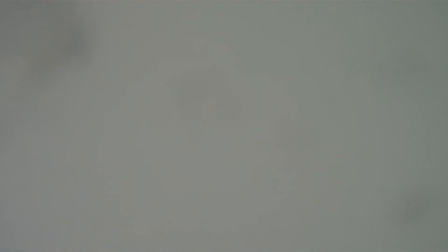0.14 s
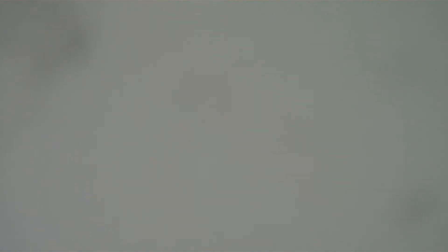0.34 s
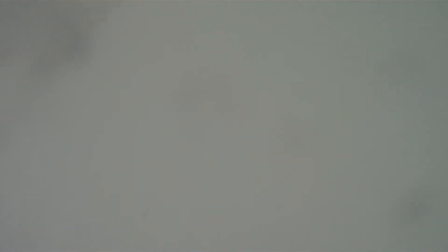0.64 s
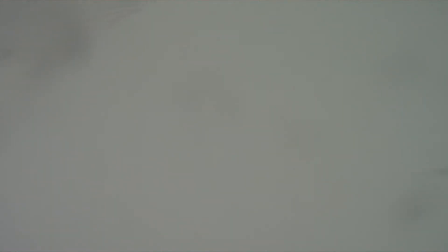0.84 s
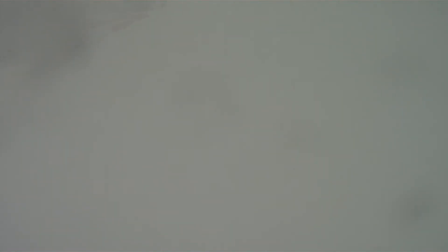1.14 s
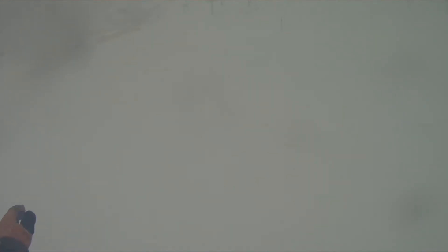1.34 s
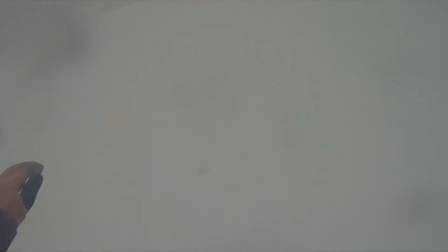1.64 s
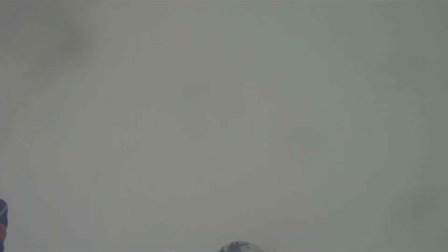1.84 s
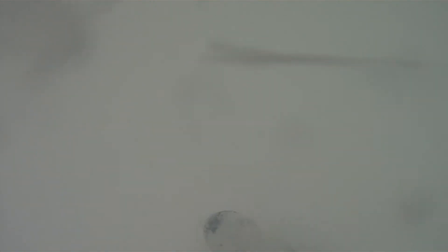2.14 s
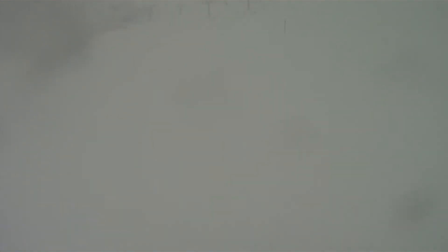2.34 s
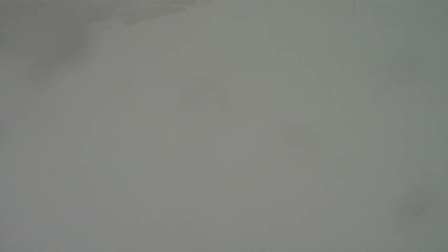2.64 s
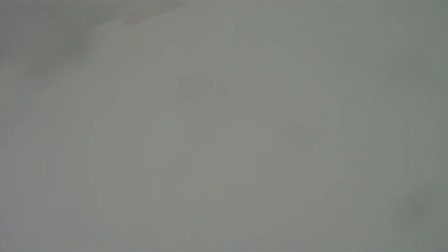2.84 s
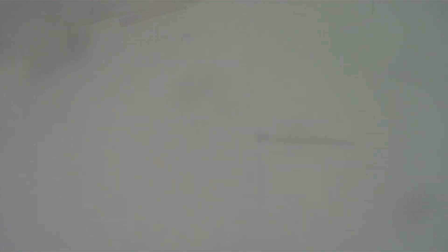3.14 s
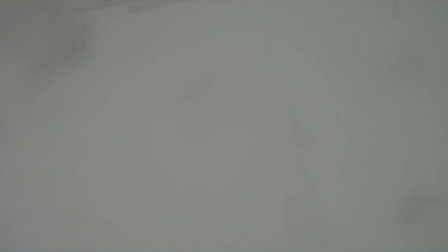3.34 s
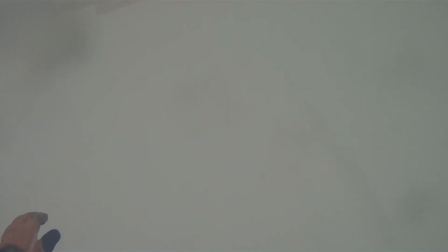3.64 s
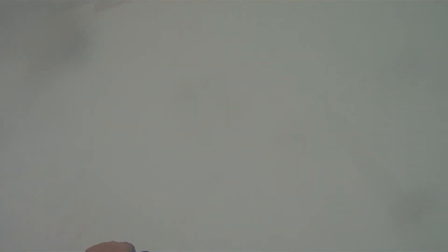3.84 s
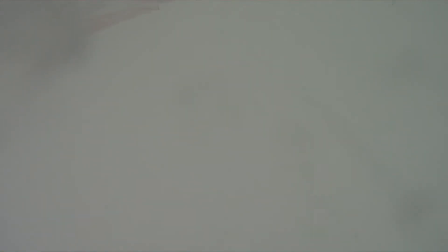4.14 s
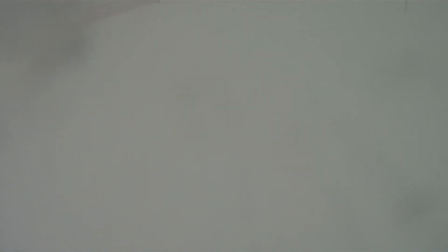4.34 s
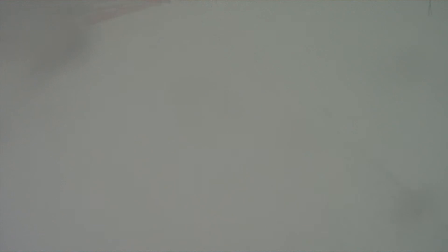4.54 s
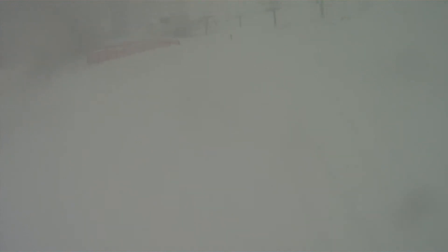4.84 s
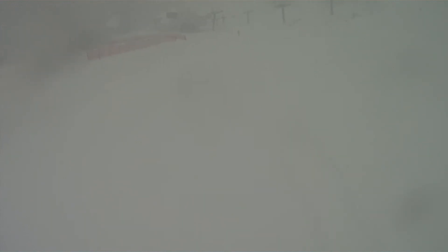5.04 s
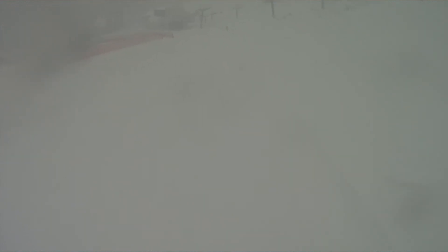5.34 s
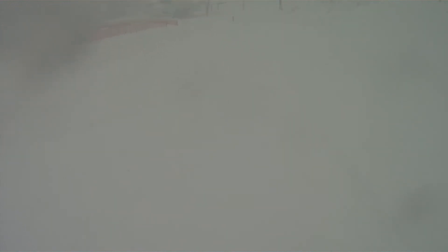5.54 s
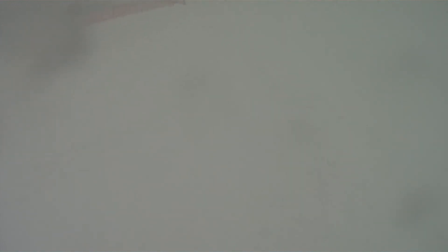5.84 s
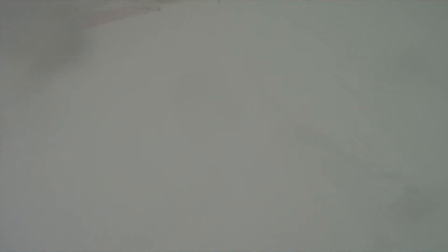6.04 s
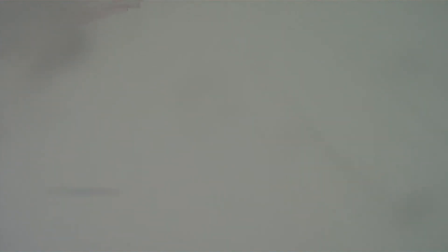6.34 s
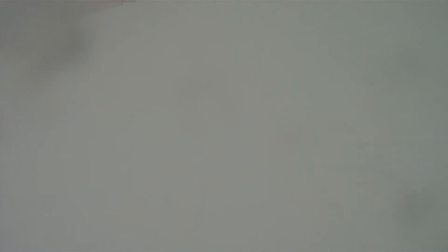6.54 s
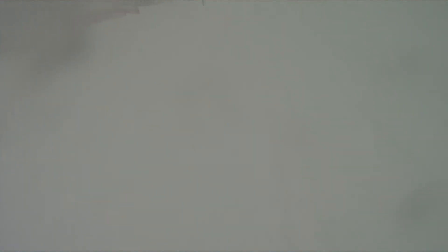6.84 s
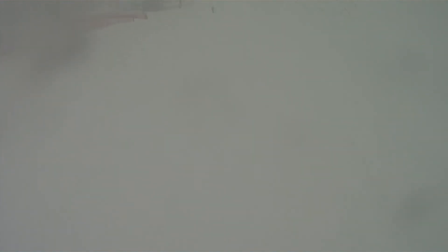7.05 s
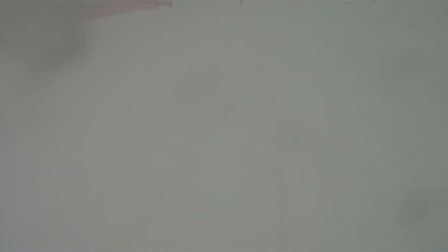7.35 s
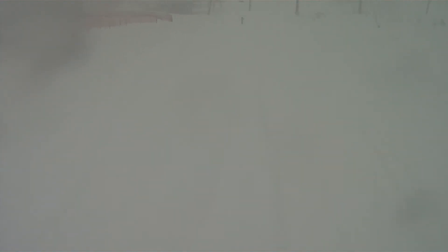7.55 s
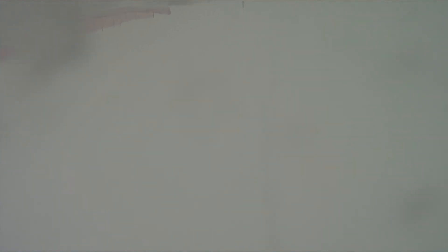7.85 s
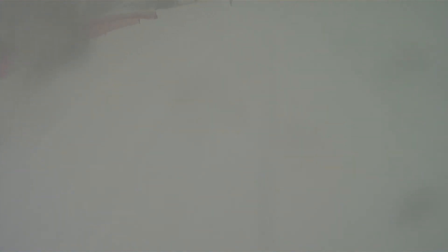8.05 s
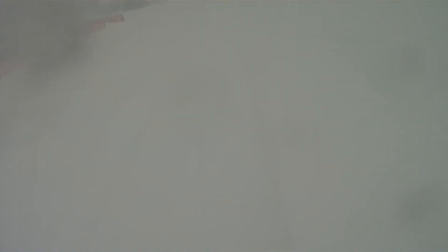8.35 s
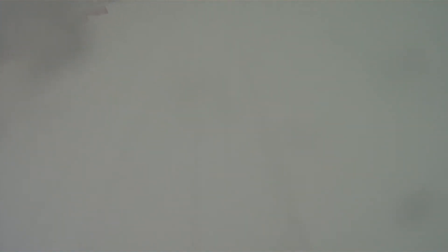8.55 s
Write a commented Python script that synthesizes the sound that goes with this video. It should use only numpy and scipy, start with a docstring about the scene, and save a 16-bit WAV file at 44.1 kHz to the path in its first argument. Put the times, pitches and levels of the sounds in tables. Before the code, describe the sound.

Snow streams over a camera case worn by a snowboarder, making a continuous, hollow hiss dotted with icy ticks and short bursts of patter. Wind buffets the microphone and the mount rumbles, most strongly early on. Several hard cracks and thumps come in quick succession, then a single knock a little later. The ride down the slope carries on with softer hiss and scattered spray, all close, with a grainy treble.

```python
"""Snowboard run from inside a camera case.

A snowboard runs down a soft slope, heard through the plastic case of a small camera on the rider.
Snow hisses and patters on the case, wind shakes it, and a few hard knocks make it thump on its mount.
Packed snow squeaks briefly. The camera samples slowly and holds each sample, which mirrors the sound
into a gritty treble."""
import sys
import numpy as np
from scipy import signal
from scipy.fft import rfft, irfft
from scipy.io import wavfile

SR = 44100
rng = np.random.default_rng(int(sys.argv[2]) if len(sys.argv) > 2 else 0)


def dump_mix(stems):
    """Bounce the given channels to the path in sys.argv[1] as a 16-bit WAV at rate SR."""
    frames = np.atleast_2d(stems).T  # one column per channel
    limited = np.clip(frames, -1, 1)  # hard clip at full scale
    pcm = np.round(limited * 32767).astype(np.int16)
    wavfile.write(sys.argv[1], SR, pcm)


N = 383669
USUAL_HISS_DB = -43.5


def from_db(db):
    """Decibels to gain."""
    return 10 ** (np.asarray(db) / 20)


def unit_rms(x):
    """Scale to rms 1."""
    return x / np.sqrt(np.mean(x ** 2) + 1e-20)


def curves(rows):
    """Each column after the time, interpolated to every sample."""
    times, *columns = np.transpose(rows)
    return [np.interp(np.arange(N) / SR, times, column) for column in columns]


def swells(times, lengths, rises_db):
    """Sum of half-cosine swells, in dB."""
    t = np.arange(N) / SR
    return sum(db * np.cos(np.pi * np.clip((t - peak_s) / length_s, -.5, .5))
               for peak_s, length_s, db in zip(times, lengths, rises_db))


def noise(spectrum):
    """Coloured noise, rms 1."""
    hz, db = np.transpose(spectrum)
    bins_hz = np.maximum(np.arange(N // 2 + 1) * SR / N, 1)
    gains = from_db(np.interp(np.log(bins_hz), np.log(hz), db))
    return unit_rms(irfft(rfft(rng.standard_normal(N)) * gains, N))


def drift(rate_hz):
    """Slow random wander, rms about 1."""
    pole = np.exp(-40 * np.pi * rate_hz / SR)
    slow = signal.lfilter([1], [1, -2 * pole, pole * pole], rng.standard_normal(N // 20 + 2002))[2000:]
    return np.interp(np.arange(N) / 20, np.arange(len(slow)), unit_rms(slow))


def resonate(x, hz, width_hz):
    """One mode, peak gain 1."""
    r = np.exp(-np.pi * width_hz / SR)
    feedback = [1, -2 * r * np.cos(2 * np.pi * hz / SR), r * r]
    return signal.lfilter(np.array([1, 0, -1]) * (1 - r * r) / 2, feedback, x + 1e-18)


def highpass(x, hz):
    """Second-order low cut."""
    return signal.sosfilt(signal.butter(2, hz, "high", fs=SR, output="sos"), x)


# Plastic case modes: (frequency [Hz], width [Hz], gain under snow [dB], gain under a knock [dB])
CASE_MODES = [(588, 93, -11, -13.5), (847, 54, -7, -15), (1111, 166, -7.5, -12.5), (1297, 117, 2, 8.5),
              (1617, 225, -2, -7), (1953, 216, 0.5, -0.5), (2184, 380, 0.5, 1.5), (2680, 490, -4.5, 4.5),
              (3025, 260, -8.5, -61), (3497, 246, -1, -23), (4520, 1000, -11.5, -33), (4793, 294, -7, -34),
              (5540, 440, -11.5, -35)]


def snow_on_case(force, spot_db, tilt_db_per_octave):
    """Each grain lands on its own spot, so it rings the modes in its own proportions."""
    out = 0
    for hz, width_hz, db, _ in CASE_MODES:
        share = from_db(spot_db * rng.uniform(-0.82, 1, N)) * rng.choice([-1, 1], N)
        tilt_db = tilt_db_per_octave * np.log2(hz / CASE_MODES[0][0])
        out = out + from_db(db + tilt_db) * resonate(force * share, hz, width_hz)
    return unit_rms(out)


# Fine powder streaming over the case: (time [s], level [dB])
POWDER = [(0.0, -36), (0.4, -35.5), (1.6, -33.5), (1.86, -35), (1.95, -42), (2.05, -38), (2.17, -42),
          (2.6, -39.5), (3.3, -42.5), (4.5, -42), (5.2, -39), (6.1, -42), (6.6, -39.5), (7.5, -42.5),
          (7.82, -44.5), (8.25, -41.5), (8.7, -47)]
# Coarse snow thrown up by the board: (peak time [s], length [s], rise [dB])
SPRAYS = [(0.17, 0.4, 5.5), (0.517, 0.11, 3), (1.616, 0.29, 3.5), (2.02, 0.078, 4.5), (2.244, 0.074, 9.5),
          (2.414, 0.098, 11), (2.887, 0.19, 6.5), (3.72, 0.15, 2), (4.16, 0.088, 4), (4.544, 0.17, 4),
          (4.915, 0.28, 5.5), (5.436, 0.16, 3), (5.584, 0.063, 6), (5.753, 0.24, 7), (6.197, 0.065, 11),
          (6.378, 0.073, 10), (6.91, 0.23, 4), (7.248, 0.25, 3.5), (7.534, 0.41, 8.5), (8.142, 0.11, 4.5),
          (8.322, 0.13, 6.5)]


def snow_flow(powder_gain_db=-3, usual_patter_db=-42, spray_in_hiss=0.37, powder_in_patter=0.36):
    """Powder and sprays set the hiss and patter levels; swing is the powder's offset from the usual."""
    powder_db = curves(POWDER)[0] + powder_gain_db
    spray_db = swells(*np.transpose(SPRAYS))
    swing_db = powder_db - USUAL_HISS_DB
    hiss_db = powder_db + spray_in_hiss * spray_db
    patter_db = usual_patter_db + powder_in_patter * swing_db + spray_db
    return hiss_db, patter_db, swing_db


def hiss(hiss_db, grains_per_s=4500, flutter_db=1.34, gain_db=0.36):
    """Fine powder: so many grains that they nearly merge."""
    grains = (rng.random(N) < grains_per_s / SR) * rng.standard_normal(N)
    level = from_db(hiss_db + gain_db + flutter_db * drift(19))
    return level * snow_on_case(grains, spot_db=3.0, tilt_db_per_octave=-1.33)


def crumble(force, decay_s, debris, chips_per_s):
    """Each lump breaks into a fast-fading shower of chips."""
    shower = signal.lfilter([1], [1, -np.exp(-1 / (decay_s * SR))], force + 1e-18)
    return debris * shower * (rng.random(N) < chips_per_s / SR) * rng.standard_normal(N)


def patter(patter_db, hiss_db, base_per_s=170, crowding=1.3, size_db=4.0, clump_db=1.5, gain_db=1.1):
    """Coarse grains land in clumps, more of them in thick powder, and crumble."""
    thickness = from_db(crowding * np.maximum(hiss_db - USUAL_HISS_DB, 0))
    lands = rng.random(N) < base_per_s * thickness * from_db(clump_db * drift(20)) / SR
    sizes = from_db(size_db * np.minimum(rng.exponential(1, N), 3.04))
    force = lands * sizes / np.sqrt(thickness)
    chips = crumble(force, decay_s=0.0019, debris=0.43, chips_per_s=3000)
    return from_db(patter_db + gain_db) * snow_on_case(force + chips, spot_db=15, tilt_db_per_octave=0.83)


def ringing_noise(hz, width_hz):
    """Noise through the same mode twice, rms 1."""
    once = resonate(rng.standard_normal(N), hz, width_hz)
    return unit_rms(resonate(once, hz, width_hz))


def hollow_tone(hiss_db, offset_db=-16.0, fast_hiss_db=-37, growth=0.66):
    """At speed, rushing air rings one low case mode; its level follows the hiss."""
    hz, width_hz = CASE_MODES[1][:2]
    level_db = hiss_db + offset_db + growth * (hiss_db - fast_hiss_db)
    return from_db(level_db) * ringing_noise(hz, 2 * width_hz)


# Roughness of the ride: (time [s], mount shake [dB], wind [dB])
RIDE = [(0.0, -48, -45.5), (1.0, -43.5, -53), (1.28, -51, -50), (1.65, -38, -48.5), (2.05, -40, -46.5),
        (2.5, -38, -51), (3.0, -52, -55), (5.1, -51.5, -60.5), (6.3, -54.5, -59), (7.6, -51.5, -57),
        (8.7, -57, -60)]
# Bumps and wind gusts: (peak time [s], length [s], shake change [dB], wind change [dB])
BUMPS_AND_GUSTS = [(0.24, 0.33, 7, 3.5), (0.865, 0.47, 3.5, 4), (1.398, 0.12, 3, 4), (1.74, 0.15, 1, 7),
                   (1.943, 0.32, -2, 12.5), (2.385, 0.16, 7, 2), (2.785, 0.12, 5.5, 9),
                   (4.843, 0.12, 5, -4), (5.13, 0.18, 6.5, -2), (5.427, 0.17, -1, 1), (5.7, 0.3, 3, 3),
                   (6.485, 0.11, 2, 13), (8.255, 0.16, 12, -5)]
# Modes of the case on its mount: (frequency [Hz], width [Hz], gain [dB])
MOUNT_MODES = [(100.8, 10.8, 4.5), (133, 133, 2.5), (204, 48, -6.5), (338, 110, -2)]
# Wind buffeting: (frequency [Hz], relative density [dB])
WIND_SPECTRUM = [(15, -20), (28, 5.5), (50, -6), (80, 4), (150, -17), (400, -23.5), (2000, -58)]


def rumble(shake_gain_db=3.0, wind_gain_db=4.0, shake_width_hz=34):
    """The ride shakes the mount's lowest mode, wind buffets the case; bumps and gusts shift the levels."""
    peak_s, length_s, shake_change_db, wind_change_db = np.transpose(BUMPS_AND_GUSTS)
    shake_db, wind_db = curves(RIDE)
    shake_db += swells(peak_s, length_s, shake_change_db)
    wind_db += swells(peak_s, length_s, wind_change_db)
    shake = from_db(shake_db + shake_gain_db) * ringing_noise(MOUNT_MODES[0][0], shake_width_hz)
    wind = from_db(wind_db + wind_gain_db) * noise(WIND_SPECTRUM)
    return shake + wind


# Rush of air and board: (frequency [Hz], relative density [dB])
RUSH_SPECTRUM = [(30, -3), (100, -8), (200, 0), (300, -6), (450, -11), (700, -16), (1500, -10.5),
                 (5000, -47)]


def rush(swing_db, usual_db=-52, swing_share=0.56):
    """Broad noise of air and board, growing with the powder."""
    return from_db(usual_db + swing_share * swing_db) * noise(RUSH_SPECTRUM)


def clicks(times, sizes):
    """One impulse at each time."""
    out = np.zeros(N)
    np.add.at(out, np.clip((np.asarray(times) * SR).astype(int), 0, N - 1), sizes)
    return out


def small_crumbs(per_s=4.0, typical_db=(-15, -14, -9.5), spread_db=(3, 7, 7), slot_s=0.04):
    """Small crumbs falling at random, as rows like LARGE_CRUMBS."""
    slots = np.arange(0, N / SR, slot_s)
    offset, chance = rng.random((2, len(slots)))
    levels_db = np.array(typical_db) + np.array(spread_db) * rng.uniform(-1, 1, (len(slots), 3))
    return np.column_stack([slots + offset * slot_s, levels_db])[chance < per_s * slot_s]


# Largest icy crumbs hitting the case: (time [s], strength [dB], low ring [dB], high ring [dB])
LARGE_CRUMBS = [(0.11, -16, 5.5, -12), (0.153, -0.5, -42, -20), (0.296, -18, -25, 9), (0.41, -8.5, -6, -6),
                (0.439, -3, -11, -1.5), (0.68, -8, -8, -25), (0.8612, -4.5, -14, -9),
                (1.069, -2.5, -35, -17), (1.499, -20, -20, 8.5), (1.559, -18.5, -11, 6),
                (1.858, -12, -19, -3), (1.962, -14.5, -8, 2), (2.247, -4, -12, -15),
                (2.338, -4.5, -24, -11), (2.394, -3, -25, -21), (2.449, -9, -16, -6.5),
                (2.545, -6, -10.5, -26), (2.82, -18, 1.5, -20), (3.109, -19, -29, 10.5),
                (3.281, -25, 11, -16), (3.499, -10.5, -10, -26), (3.679, -6, -14, -19),
                (3.739, -13, -12, -25), (3.831, -12, -4.5, 1.5), (4.11, -6, -14, -27),
                (4.154, -12, -11, -24), (4.226, -9, -12.5, -5.5), (4.334, -7, -8, -32), (4.627, -16, -1, 0),
                (4.751, -12.5, -6, -5), (4.835, -7.5, -15, -7), (4.931, -9, -5, 0.5), (5.064, -15.5, 2, -1),
                (5.331, -5, -16, -20), (5.532, -7.5, -31, -11), (6.057, -12, 0, -3.5),
                (6.187, -5.5, -14, -8), (6.456, -5.5, -12.5, -13), (6.491, -13.5, 1.5, -4),
                (6.6415, -2.5, -8, -8), (6.803, -14, -3.5, -2), (7.278, -20.5, -34, 14),
                (7.355, -20.5, 4.5, 8.5), (7.568, -4, -12, -12), (7.652, -8.5, -13, -6),
                (7.83, -7.5, -30, -6), (8.118, -7, -10, -28), (8.168, -6, -9, -37),
                (8.43, -13.5, -3.5, -3.5), (8.587, -11, -3, -3)]


def crumbs(gain_db=15, low_gain_db=10, high_gain_db=6, spot_db=-0.5, thud_db=-3):
    """Single hard crumbs tick on the case, each with its own mix of thud, low ring and high ring."""
    times, strength_db, low_db, high_db = np.vstack([LARGE_CRUMBS, small_crumbs()]).T
    scatter_db = spot_db * rng.standard_normal((len(times), len(CASE_MODES)))
    thud = resonate(clicks(times, from_db(strength_db + low_db + thud_db)), hz=330, width_hz=220)
    ring = 0
    for k, (hz, width_hz, db, _) in enumerate(CASE_MODES):
        low_share = np.interp(hz, [1100, 1900], [1, 0])
        high_share = np.interp(hz, [2300, 3500], [0, 1])
        colour_db = low_share * (low_db + low_gain_db) + high_share * (high_db + high_gain_db)
        force = clicks(times, from_db(strength_db + colour_db + scatter_db[:, k]))
        chips = crumble(force, decay_s=0.0016, debris=0.16, chips_per_s=20000)
        ring = ring + from_db(db) * resonate((-1) ** k * force + chips, hz, width_hz)
    return from_db(gain_db) * (thud + ring)


def pushes(times, levels_db, lengths):
    """Smooth force pulses: the longer the contact, the duller the blow."""
    out = np.zeros(N)
    for start_s, db, length_s in zip(times, levels_db, lengths):
        span = int(start_s * SR) + np.arange(SR // 50)
        pulse = np.sin(np.pi * np.clip((span / SR - start_s) / length_s, 0, 1)) ** 2
        out[span] += from_db(db) * pulse / (pulse.sum() + 1e-9)
    return out


# Knocks on the case: (time [s], thump [dB], push [s], crack [dB], contact [s], snow crunch [dB])
KNOCKS = [(1.5838, -14.5, 0.0058, -11, 0.00087, -29), (1.6584, -38, 0.003, 1, 0.0015, -40),
          (1.885, -6, 0.0097, -50, .0010, -19), (1.9009, 1.5, 0.0075, -11, 0.00015, -3),
          (2.0842, -1, 0.011, -50, .0010, -14), (2.1025, 4, 0.0049, 9, 0.0005, -18),
          (2.267, -40, 0.0012, -12, 0.001, -39), (2.2892, -4.5, 0.0048, -2, 0.00065, -40),
          (2.4629, -4.5, 0.0045, 3.5, 0.00063, -38), (4.349, -5, 0.0047, 0.5, 0.00061, -21),
          (5.441, -34, 0.0015, -42, 0.00033, -27), (6.4700, -17.5, 0.012, -38, 0.00046, -41),
          (8.223, -17, 0.014, -23, 0.0004, -44)]


def knocks(crack_gain_db=26, thump_gain_db=43, crunch_gain_db=52,
           bounce_s=0.00273, bounce=0.22, damping=0.8):
    """A contact and its rebound crack through the case; a slower push crushes snow and swings the mount."""
    times, thump_db, push_s, crack_db, contact_s, crunch_db = np.transpose(KNOCKS)
    contact = pushes(times, crack_db, contact_s) + bounce * pushes(times + bounce_s, crack_db, contact_s)
    crack = sum(from_db(db) * resonate(contact, hz, width_hz * damping)
                for hz, width_hz, _, db in CASE_MODES)
    grit = np.diff(rng.standard_normal(N + 1)) * pushes(times - push_s / 4, crunch_db, push_s)
    crunch = sum(from_db(db) * resonate(grit * (-1) ** k, hz, width_hz)
                 for k, (hz, width_hz, db, _) in enumerate(CASE_MODES))
    push = pushes(times, thump_db, push_s)
    thump = sum(from_db(db) * resonate(push, hz, width_hz) for hz, width_hz, db in MOUNT_MODES)
    return (from_db(crack_gain_db) * highpass(crack, hz=640)
            + from_db(crunch_gain_db) * crunch
            - from_db(thump_gain_db) * highpass(thump, hz=68))


# Snow squeaks: (time [s], pitch [Hz], level [dB], length [s])
SQUEAKS = [(4.4435, 2700, -28, 0.0047), (5.532, 2824, -16, 0.0023), (6.198, 2640, -27, 0.011)]


def squeaks(waver=0.04):
    """Packed snow sticks and slips for a moment at a wavering pitch."""
    t = np.arange(N) / SR
    pitch_ratio = 1 + waver * drift(164)
    out = 0
    for start_s, hz, db, length_s in SQUEAKS:
        swell = np.sin(np.pi * np.clip((t - start_s) / length_s, 0, 1))
        out = out + from_db(db) * swell * np.sin(2 * np.pi * np.cumsum(hz * pitch_ratio) / SR)
    return out


def scene():
    """Everything reaches one microphone through the case."""
    hiss_db, patter_db, swing_db = snow_flow()
    snow = hiss(hiss_db) + patter(patter_db, hiss_db) + crumbs() + squeaks()
    return (snow + hollow_tone(hiss_db) + knocks() + rumble() + rush(swing_db))[None]


def gain_control(x, limit_db=-0.5, release_db_per_s=55, attack_s=0.0065):
    """An overload pulls the gain down; it then creeps back."""
    over_db = np.maximum(20 * np.log10(np.abs(x) + 1e-9) - limit_db, 0)
    release_db = release_db_per_s * np.arange(N) / SR
    held_db = np.maximum.accumulate(over_db + release_db) - release_db
    pole = np.exp(-1 / (attack_s * SR))
    return x * from_db(-signal.lfilter([1 - pole], [1, -pole], held_db))


def record(dry, band_hz=5600, camera_rate_hz=12000, hold_ticks=4, cutoff_hz=15700):
    """Camera: gain control, slow sampling with clipping, sample hold, top cut."""
    band = signal.sosfilt(signal.butter(14, band_hz, fs=SR, output="sos"), gain_control(dry[0]))
    samples = np.clip(signal.resample_poly(band, camera_rate_hz, SR), -1, 1)
    steps = signal.resample_poly(np.repeat(samples, hold_ticks), SR, hold_ticks * camera_rate_hz)[:N]
    return signal.sosfilt(signal.ellip(10, .1, 80, cutoff_hz, fs=SR, output="sos"), steps)[None]


dry = scene()
out = record(dry)
dump_mix(out)
```